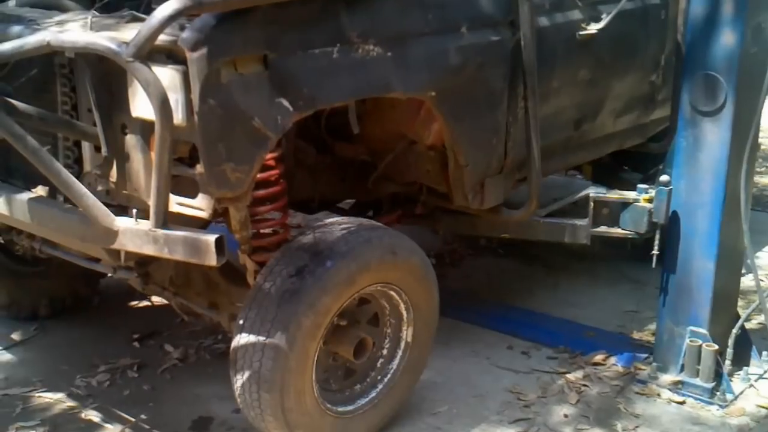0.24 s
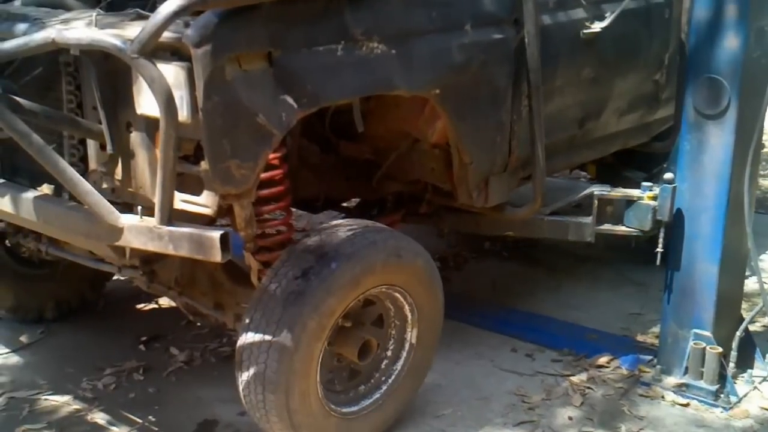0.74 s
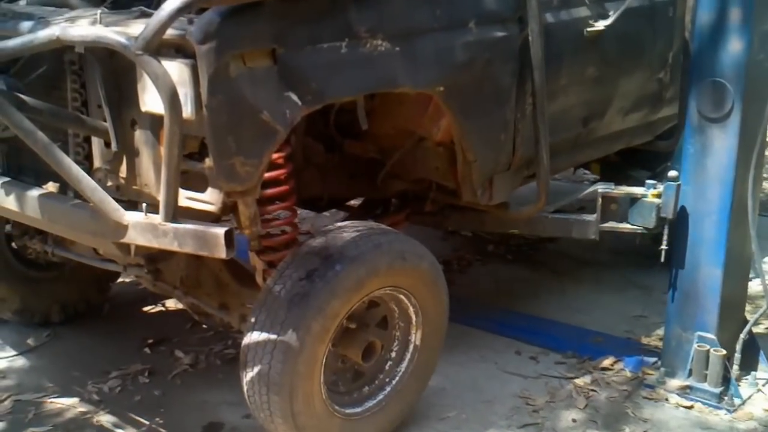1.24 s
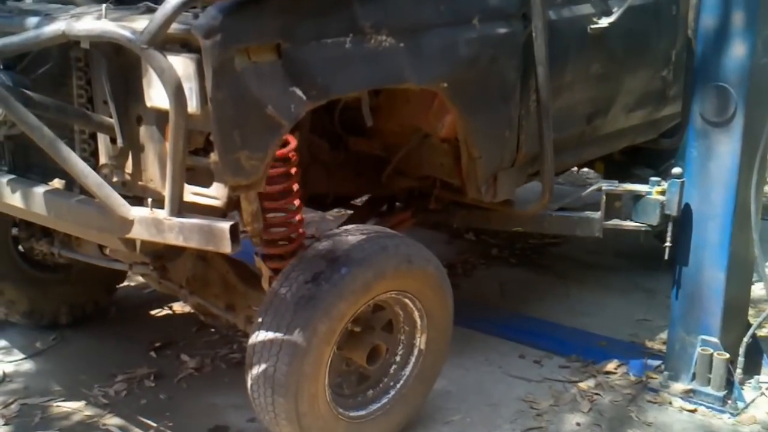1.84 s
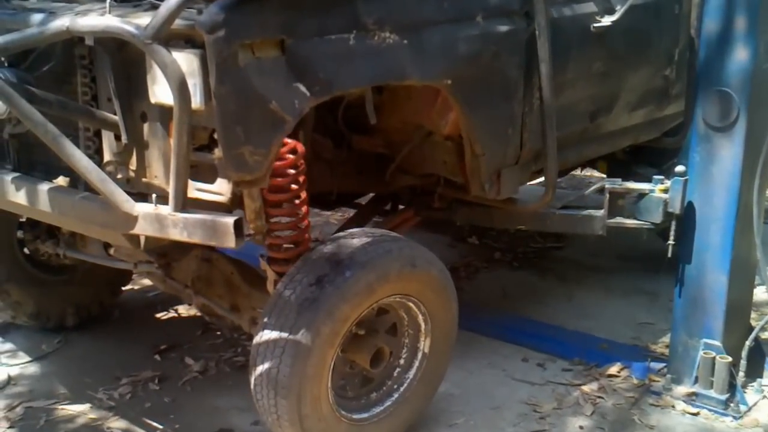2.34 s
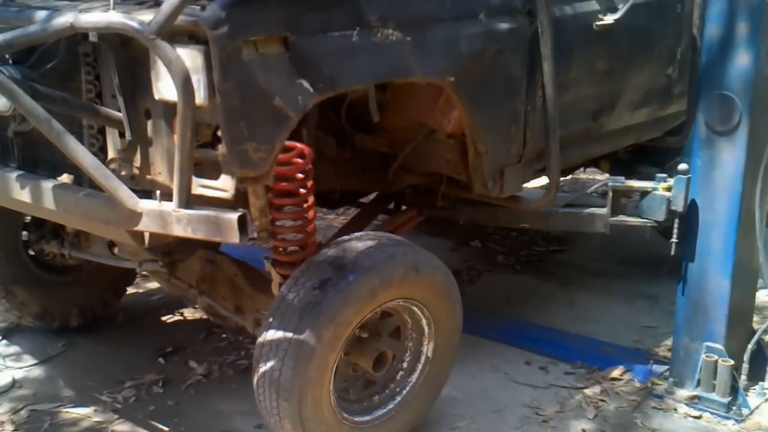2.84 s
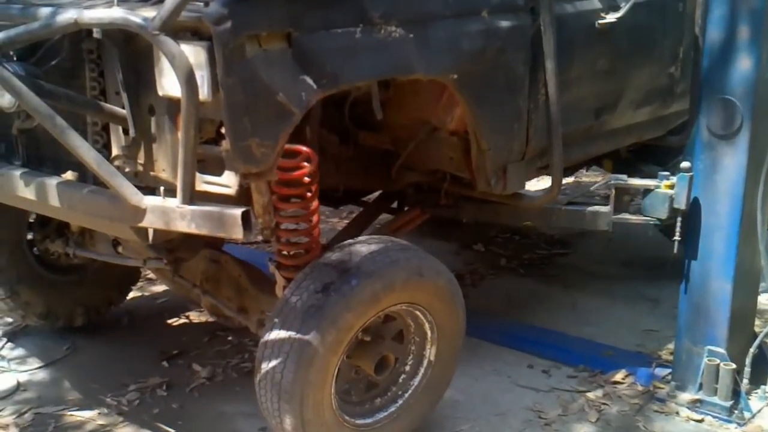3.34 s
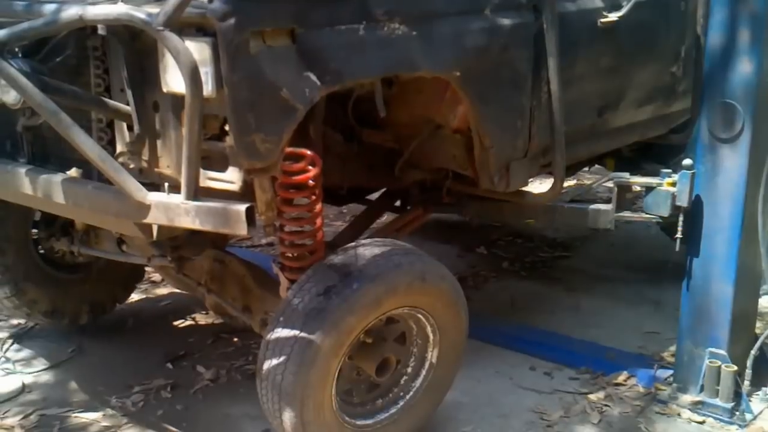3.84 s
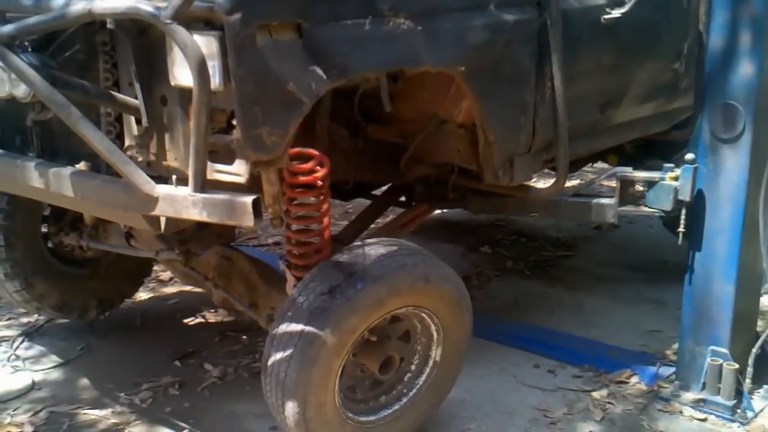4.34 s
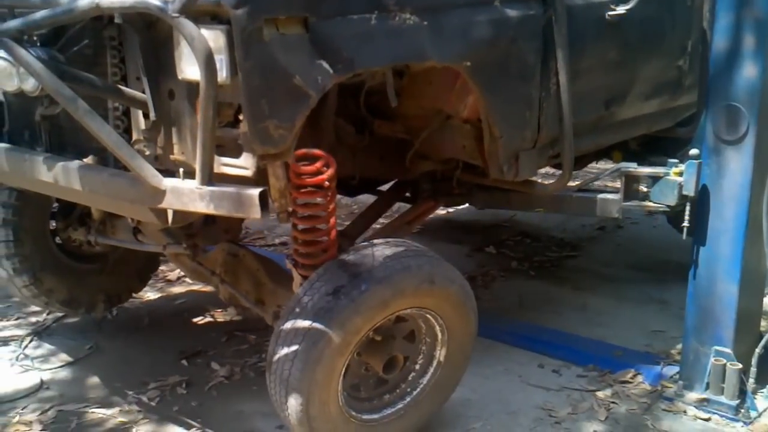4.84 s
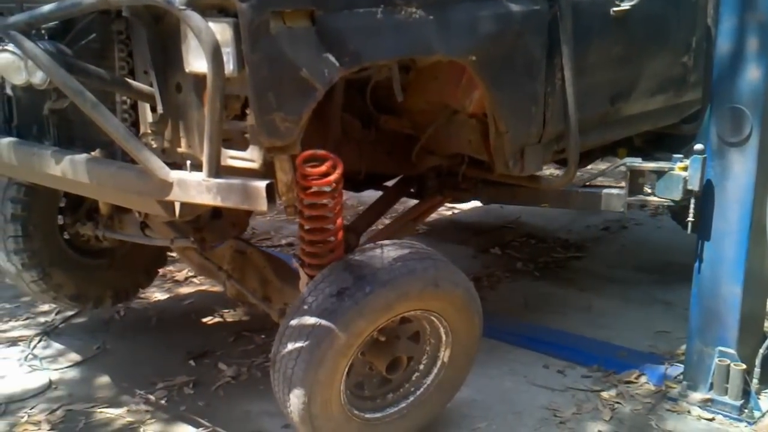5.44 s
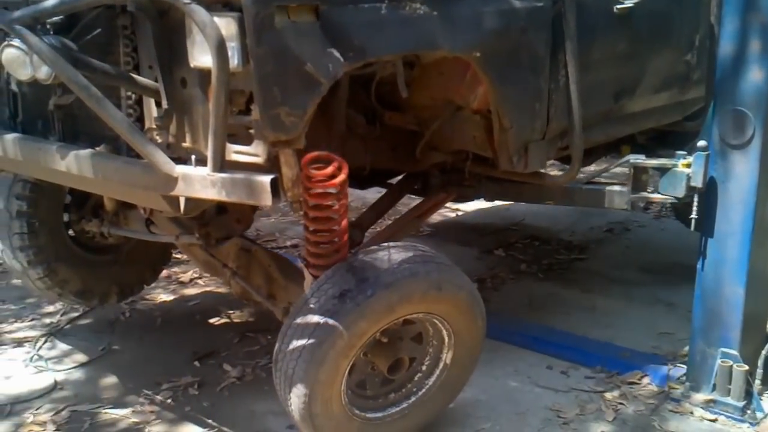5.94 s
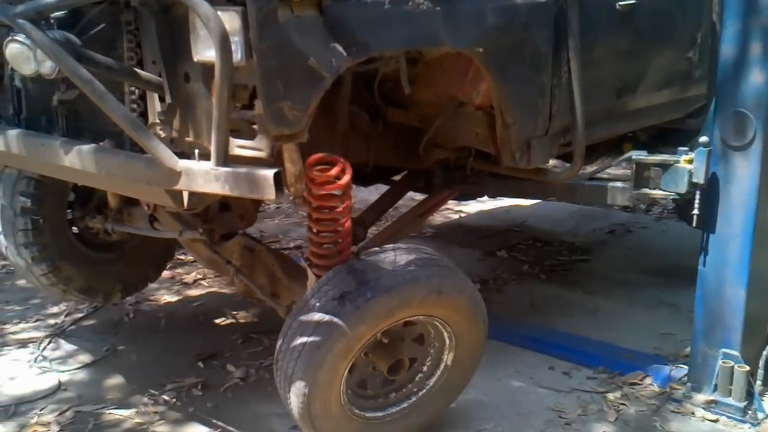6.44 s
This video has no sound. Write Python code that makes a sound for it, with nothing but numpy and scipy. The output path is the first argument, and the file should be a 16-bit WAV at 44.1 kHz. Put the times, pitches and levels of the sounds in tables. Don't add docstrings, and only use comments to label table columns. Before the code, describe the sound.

An electric hydraulic pump whines and roars steadily in an open garage while a lift's safety latch clanks hard about every two seconds.

```python
import sys
import numpy as np
from scipy import signal
from scipy.fft import rfft, irfft
from scipy.io import wavfile
from scipy.ndimage import uniform_filter1d

SR = 44100
rng = np.random.default_rng(int(sys.argv[2]) if len(sys.argv) > 2 else 0)


def undo_db(level):
    steps = np.asarray(level, float) / 20
    return 10 ** steps


def file_out(sig):
    cols = np.atleast_2d(sig).T
    lim = np.clip(cols, -1, 1)
    pcm = np.round(lim * 32767).astype(np.int16)
    wavfile.write(sys.argv[1], SR, pcm)


N = 295405
SLOW_STEP = 200
SLOW_S = np.arange(N // SLOW_STEP + 2) * SLOW_STEP / SR

# (time [s], speed relative to the loaded speed [ratio])
SHAFT_SPEED = [
    (0, 1.0041),
    (1, 1.0028),
    (2.5, 1.0003),
    (6.7, .9993),
]
HUM_HZ = (360.1, 458.8, 481.2, 504.3, 745.1, 940.5)
WHINE_HZ = (1092.3, 1181.2, 1661.9, 1707.3)
POST_HZ = (1226.4, 1422.4, 1467.7, 1949.0)
PIPE_HZ = (2016.7, 2143.4, 2304.7, 2405.3)
REST_DB = [-48, -51.5, -48, -37.5, -54, -50, -52, -46, -38, -51.5, -48, -43, -44, -45, -40, -43, -38, -42]
# (time of top [s], level [dB rms], length [s])
HUM_SWELLS = [
    [(2.2, -44, 1.6), (3.5, -39, 1.9), (4.32, -42, 0.64), (5.22, -38, 3.8)],
    [(.15, -38.5, 0.4), (1.1, -34.5, 0.67), (2.05, -29.5, 1), (2.75, -39, 0.96), (4.98, -34, 0.39),
     (6.52, -38, 0.6)],
    [(.74, -28.5, 0.95), (1.89, -32, 0.19), (4.82, -29, 0.55), (3.2, -40, 0.32), (5.4, -35.5, 0.34),
     (6.0, -37, 0.35)],
    [(.7, -33, 0.17), (1.08, -34, 0.11), (1.97, -35.5, 1), (3.11, -24, 0.74), (3.9, -33.5, 1),
     (4.5, -28.5, 0.31), (4.99, -27, 0.19), (5.6, -20, 0.82), (6.08, -27.5, 0.58)],
    [(2.1, -44, 1.9), (4.05, -45, 0.31), (6.0, -40, 2)],
    [(3.1, -37.5, 0.3), (3.61, -38, 0.46), (4.2, -39, 0.4), (2.0, -53, 0.99), (6, -37, 0.3)],
]
WHINE_SWELLS = [
    [(0.36, -32, 0.28), (0.9, -36.5, 0.8), (2.48, -31.5, 1.9), (3.25, -25, 0.23), (3.77, -26.5, 0.3),
     (4.33, -30, 1.43), (6.56, -38.5, 2.1)],
    [(0.81, -24.5, 0.66), (1.67, -33, 0.91), (3.8, -40, 2.7), (4.81, -35.6, 0.26), (5.7, -38, 0.64)],
    [(0.04, -25, 0.15), (0.41, -31.5, 0.25), (1.09, -23.5, 0.14), (1.52, -30, 0.48), (5.46, -64, 0.51)],
    [(1.2, -27.5, 0.84), (2.1, -24.5, 0.71), (3.18, -32, 0.23), (3.96, -29.5, 0.5), (5.45, -63, 0.15),
     (5.7, -38, 2.9), (6.47, -32, 1.2)],
]
POST_SWELLS = [
    [(1.67, -34.5, 0.63), (2.35, -36, 0.5), (3.94, -33.5, 1), (4.99, -24.5, 0.16), (5.37, -31, 0.48),
     (6.42, -34, 0.67)],
    [(0.5, -34, 0.35), (1.3, -35.5, 1), (3.48, -37, 1), (3.96, -26, 0.11), (4.83, -29, 0.28),
     (5.19, -32, 0.37)],
    [(0.51, -30, 0.18), (0.95, -29, 0.49), (1.67, -35, 0.51), (4.85, -30, 0.3), (5.7, -39, 0.39)],
    [(1.32, -29, 0.97), (2.05, -28.5, 0.58), (3.21, -30.5, 1.3), (5.4, -41, 2), (0.17, -35, 0.69)],
]
PIPE_SWELLS = [
    [(0.92, -32.5, 0.76), (2.95, -31, 0.36), (5.24, -36, 1)],
    [(1.2, -44, 4), (3.4, -49, 1.8), (5.19, -30, 0.28), (5.91, -31.5, 0.97)],
    [(1.28, -61, 5.5), (2.57, -50.5, 0.22), (6.6, -37, 0.34)],
    [(1.0, -44, 2.4), (3.46, -36, 0.93), (4.98, -30, 0.83)],
]
# (frequency [Hz], rest level [dB rms], swell level [dB rms], time of top [s],
# length [s])
WEAK_ORDERS = [(213.5, -66, -54, 4.6, 1), (240.2, -54, -51, 4.2, 4), (263.1, -57, -45, 4.2, 1),
               (288.0, -51, -45, 0.4, 1.6), (296.1, -52, -46, 5.4, 0.6), (305.5, -56, -44, 5.0, 0.6),
               (328.4, -59, -51, 1.8, 1), (346.5, -46, -50, 5.0, 1), (411.8, -47, -46, 4.2, 4),
               (422.6, -50, -45, 5.0, 1), (494.6, -49, -48, 5.4, 1.6), (516.8, -55, -42, 1.2, 0.6),
               (528.2, -63, -48, 3.6, 4), (546.4, -55, -47, 5.4, 4), (587.5, -59, -54, 4.8, 4),
               (634.6, -60, -53, 5.6, 0.6), (699.8, -54, -43, 2.45, 0.9), (909.8, -55, -42, 6.3, 1.6),
               (963.6, -60, -49, 2.6, 1.6), (985.8, -50, -46, 4.8, 0.6), (1008.7, -55, -37, 5.6, 0.6),
               (1056.5, -53, -51, 4.2, 1.6), (1135.9, -46, -43, 1.8, 0.6), (1150.7, -55, -40, 3.0, 1),
               (1209.9, -49, -49, 6.4, 1.6), (1273.8, -48, -50, 0.6, 1.6), (1297.4, -52, -48, 6.0, 1),
               (1333.0, -55, -47, 2.8, 1.6), (1438.0, -49, -50, 5.8, 2.5), (1456.2, -53, -41, 4.8, 2.5),
               (1514.1, -53, -39, 1.4, 2.5), (1541.0, -43, -46, 5.4, 1.6), (1587.4, -52, -42, 4.0, 1.6),
               (1615.0, -49, -44, 4.6, 2.5), (1696.4, -52, -41, 5.0, 1.6), (1761.0, -48, -39, 5.8, 1),
               (1784.6, -40, -44, 3.0, 0.6), (1819.6, -40, -38, 4.6, 1), (1903.0, -42, -40, 1.4, 1.6),
               (2001.2, -41, -41, 0.2, 2.5),
               (2073.2, -46, -42, 5.8, 1), (2188.3, -46, -34, 4.8, 2.5), (2242.8, -47, -45, 0.2, 0.6),
               (2283.9, -47, -41, 5.4, 1.6), (2363.9, -40, -41, 6.4, 2.5), (2384.8, -47, -36, 2.6, 0.6),
               (2427.9, -48, -43, 1.0, 1), (2524.1, -47, -56, 3.4, 0.6), (2592.7, -54, -55, 4.0, 2.5),
               (2626.4, -47, -43, 0.8, 1), (2641.9, -53, -42, 5.0, 4), (2670.1, -60, -47, 4.0, 2.5),
               (2706.5, -55, -51, 1.4, 1), (2729.3, -54, -55, 1.6, 1), (2866.6, -47, -43, 6.6, 4),
               (2911.0, -46, -49, 2.0, 4), (3103.5, -49, -48, 5.0, 1), (3151.2, -43, -41, 3.0, 0.6),
               (3170.1, -56, -50, 4.4, 2.5), (3191.0, -55, -49, 2.2, 2.5), (3227.3, -47, -47, 2.8, 1.6),
               (3345.7, -57, -54, 6.2, 1.6), (3388.8, -58, -51, 2.6, 1), (3456.1, -56, -53, 2.6, 4),
               (3479.0, -55, -47, 1.6, 0.6), (3516.0, -54, -54, 0.6, 0.6), (3686.2, -58, -58, 3.0, 2.5),
               (3705.7, -65, -53, 4.8, 0.6), (3721.9, -61, -55, 2.2, 1), (3745.4, -57, -55, 3.4, 1),
               (3802.6, -64, -60, 1.4, 1), (3866.6, -65, -56, 0.4, 0.6), (3974.2, -70, -66, 5.4, 2.5),
               (4009.9, -73, -63, 2.2, 1.6), (4032.8, -71, -63, 3.2, 2.5), (4092.0, -66, -72, 6.4, 4),
               (4184.8, -75, -64, 3.0, 1), (4262.9, -76, -69, 4.0, 2.5), (4548.2, -71, -69, 5.4, 0.6),
               (4667.3, -73, -75, 1.0, 0.6),
               (699.8, -62, -44, 5.7, 1.2), (2549, -52, -52, 3, 2), (2943, -55, -54, 3, 2),
                (3024, -59, -56, 3, 2), (3062, -58, -57, 4, 2), (3628, -61, -56, 3, 1.6)]
# (frequency [Hz], level [dB rms])
BEATING_TONES = [(176.13, -54), (182.0, -52)]
# (time [s], clank [dB], thud [dB], clank ring [s], struck ring [dB])
LATCH_CONTACTS = [(0.478, -31, -19, 0.11, -30), (0.496, -36, -20.5, 0.28, -32),
                  (0.539, -38, -19, 0.15, -41), (2.294, -16, -17, 0.14, -44),
                  (2.311, -25, -24, 0.54, -28.5), (2.328, -25, -25, 0.33, -37),
                  (4.242, -14.5, -16.5, 0.14, -36), (4.261, -14.5, -25, 0.19, -33),
                  (4.272, -14, -30, 0.08, -53), (4.289, -20, -24.5, 0.26, -36),
                  (6.183, -15.5, -11.5, 0.049, -28), (6.193, -9, -20, 0.062, -28),
                  (6.211, -13, -21, 0.14, -41), (6.229, -18, -23, 0.23, -43)]
# (time [s], peak level [dB])
KNOCKS = [(0.4775, -19), (0.4808, -13), (0.4838, -20), (0.4895, -9), (0.4933, -11), (0.4979, -11),
          (0.503, -5), (0.5155, -13), (0.5192, -10), (0.553, -22), (0.5625, -12), (2.294, -10),
          (2.2976, -8), (2.3032, -9), (2.3069, -11), (2.3106, -5), (2.3173, -5.5), (2.3217, -11),
          (2.3297, -14), (2.3374, -15), (2.3445, -12), (2.3529, -7), (4.2455, -10), (4.2486, -22),
          (4.2531, -10), (4.2572, -7), (4.2609, -7), (4.2644, -8), (4.2674, -7.5), (4.2705, -16),
          (4.2735, -10), (4.2809, -10.5), (4.2904, -6), (6.1677, -6), (6.1838, -9), (6.1905, -11),
          (6.1944, -6), (6.1978, -12), (6.2017, -13), (6.2062, -14), (6.2105, -13), (6.2137, -13),
          (6.2199, -10), (6.232, -12)]
# (frequency [Hz], width [Hz], level [dB])
POST_LOW = [(197, 22, -3), (315, 62, -0.5), (712, 86, 0.5), (753, 120, -1), (950, 76, -1), (1226, 62, -1)]
POST_HIGH = [(1560, 184, 6), (2053, 220, 8.5), (2400, 126, 3.5), (2600, 300, -1), (3430, 1250, -11.5),
             (4250, 320, -12.5), (4600, 370, -22), (8040, 6000, -28.5)]
# (frequency [Hz], width [Hz], level [dB])
STEEL_CRACK = [(3600, 1600, -13), (5600, 2500, -29), (9500, 6000, -48)]
# (frequency [Hz], level [dB], t60 [s])
STRUCK_MODES = [(220, -5.5, 0.21), (253.3, -2.5, 0.45), (314, -29, .4), (692, -9, 0.34), (789, 0, 0.19),
                (940, -8, 0.046), (1185, 1, 0.21), (1990, 11, 0.076), (2020, 1, 0.07), (2566, 16, 0.2)]
# (time [s], frequency [Hz], level [dB], t60 [s])
CARRIAGE_RINGS = [(0.489, 250, -17.5, 0.22), (.495, 797, -17, 0.18), (.5, 940, -28, 0.17),
                  (.52, 708, -21.5, 0.28), (.535, 250, -26, 0.25), (.545, 275, -24, 1.1),
                  (2.30, 813, -26, .3), (2.30, 315, -19, 0.25), (2.335, 272.5, -24.5, 1.7),
                  (4.248, 323, -26, 0.7), (4.25, 660, -31, .15), (6.187, 940, -19, 0.18),
                  (6.189, 276, -23, 0.44)]
# (frequency [Hz], level [dB per Hz])
ROAR = [(25, -77), (100, -82.5), (165, -80), (200, -78.5), (290, -65.5), (540, -62), (600, -69.5),
        (870, -67.5), (1400, -65), (2400, -56), (2520, -60), (3400, -68.5), (4000, -78.5), (5600, -90)]
# (frequency [Hz], level [dB per Hz])
OIL_HISS = [(3000, -95), (4500, -85), (5600, -91), (6500, -85), (8000, -86), (9000, -88), (11500, -88),
            (12500, -91), (13300, -94), (13800, -89), (13900, -110)]
# (frequency [Hz], width [Hz], level above the roar [dB])
PANELS = [(328, 15, 3.5), (412, 16, 9), (469, 44, 10), (690, 58, 3.5), (1127, 98, 8.5), (1476, 65, 8),
          (1720, 195, 7.5), (2060, 140, -1.5), (2260, 160, -3), (2725, 190, 5.5), (3290, 90, 2.5),
          (3413, 39, 6.5), (3680, 200, 3.5), (3870, 60, 3), (5320, 460, 3.5), (6970, 440, 4.5),
          (7720, 160, 6)]
# (frequency [Hz], width [Hz], depth [dB])
PANEL_GAPS = [(278, 12, 6), (380, 24, 6), (434, 16, 5), (492, 10, 3), (522, 20, 2), (560, 14, 5),
              (615, 16, 4), (1262, 14, 5), (1312, 16, 4), (1490, 16, 3), (1640, 16, 3), (1740, 30, 2),
              (2100, 40, 3), (2530, 190, 6), (2690, 120, 4), (2965, 30, 3), (3500, 500, 1), (4480, 160, 2)]
# (frequency [Hz], level [dB])
LOW_SIDE = [(25, 16), (60, 21.5), (130, -4), (350, -17), (550, -8), (900, -13), (1250, -23)]
# (frequency [Hz], level [dB])
MID_LEAK = [(2000, -26), (5300, -5.5), (7000, -5.5), (13000, 0.5)]
# (frequency [Hz], left minus right [dB])
PORT_TILT = [(60, -1.5), (200, -2.5), (360, -.5), (660, -2.5), (1200, 0), (1800, 2.5), (2300, 1),
             (3100, -4), (4000, -1), (4500, 0)]
# (time [s], left minus right [dB])
MIC_TURN = [
    (0.0, 2),
    (0.5, 1.5),
    (1.53, 0),
    (3.15, -0.3),
    (4.25, 0),
    (4.68, 0),
    (6.2, 0.5),
    (6.7, 1),
]
# (low edge [Hz], high edge [Hz], share
MID_MUTES = [(2480, 2690, .5), (4600, 4880, .12), (4880, 5200, .62), (5200, 5700, .85), (7580, 8270, .28),
             (9700, 10400, .16), (10400, 10900, .14), (12450, 13300, .44)]
SIDE_MUTES = [(1000, 1320, .5), (3830, 4180, .68), (5480, 5720, .12), (6100, 6350, .5), (6350, 6870, .98),
              (8700, 9050, .4), (9050, 9570, .95), (11050, 11400, .45), (11400, 12150, .82),
              (12150, 12450, .3), (12300, 12700, .08), (13250, 13600, .2), (13600, 14100, .35)]


def in_time(rows):
    s, *columns = np.transpose(rows)
    return [np.interp(np.arange(N) / SR, s, column) for column in columns]


def at_hz(points, hz):
    table_hz, db = np.transpose(points)
    return np.interp(np.log(hz), np.log(table_hz), db)


def drift(rate, count):
    r = np.exp(-2 * np.pi * rate * SLOW_STEP / SR)
    chance = rng.standard_normal((count, N // SLOW_STEP + 402))
    slow = signal.lfilter([1], [1, -2 * r, r * r], chance)[:, 400:]
    return slow / slow.std(axis=1, keepdims=True)


def full(slow):
    return np.interp(np.arange(N) / SLOW_STEP, np.arange(len(slow)), slow)


def swell(top_s, db, length_s):
    return undo_db(db) * np.exp(-(2 * (SLOW_S - top_s) / length_s) ** 2)


def add_at(track, s, sound):
    at = round(s * SR)
    length = sound.shape[-1]
    track[..., at:at + length] += sound[..., :N - at]


def resonate(x, modes):
    out = 0
    for k, (hz, width_hz, db) in enumerate(modes):
        r = np.exp(-np.pi * width_hz / SR)
        poles = [1, -2 * r * np.cos(2 * np.pi * hz / SR), r * r]
        zeros = [(1 - r * r) / 2, 0, -(1 - r * r) / 2]
        out = out + (-1) ** k * undo_db(db) * signal.lfilter(zeros, poles, x)
    return out


def partials(hz_list, gains, wobble, rate):
    side_flips_hz = 2350
    turns = np.cumsum(in_time(SHAFT_SPEED)[0]) / SR
    out = np.zeros((2, N))
    for hz, gain in zip(hz_list, gains):
        shared, own = drift(rate, count=2)
        phase = 2 * np.pi * (hz * turns + rng.random()) + wobble * full(shared)
        side_sign = np.sign(side_flips_hz - hz)
        out[0] += np.sqrt(2) * gain * np.sin(phase)
        out[1] += np.sqrt(2) * gain * np.cos(phase + wobble * full(own)) * side_sign
    return out


def motor_and_gears(flutter_db=1.5, flutter_per_s=3.0, scatter=0.16):
    swells = HUM_SWELLS + WHINE_SWELLS + POST_SWELLS + PIPE_SWELLS
    flutter = flutter_db * drift(flutter_per_s, count=len(swells))
    fades = np.abs(1 + scatter * drift(flutter_per_s, count=len(swells)))
    fades[:len(HUM_HZ)] = 1
    gains = []
    for rest, shake, rows, fade in zip(REST_DB, flutter, swells, fades):
        gain = undo_db(rest + shake) + sum(swell(*row) for row in rows)
        gains.append(full(gain) * full(fade))
    return partials(HUM_HZ + WHINE_HZ + POST_HZ + PIPE_HZ, gains, wobble=0.14, rate=3.0)


def orders(scatter=0.52, fade_rate=1.86):
    table = WEAK_ORDERS
    paths = np.abs(1 + scatter * drift(fade_rate, count=len(table)))
    gains = []
    for (hz, rest, db, top, length), path in zip(table, paths):
        gains.append(full(path * (undo_db(rest) + swell(top, db, length))))
    return undo_db(0.87) * partials([row[0] for row in table], gains, wobble=0.7, rate=2.7)


def low_tones(in_step_s=0.015):
    turns = np.cumsum(in_time(SHAFT_SPEED)[0]) / SR - in_step_s
    quarter_turn = np.array([[0], [np.pi / 2]])
    return sum(np.sqrt(2) * undo_db(db) * np.sin(2 * np.pi * hz * turns + quarter_turn)
               for hz, db in BEATING_TONES)


def latch(rise_s=0.002, struck_rise_s=0.00088, rattle_per_s=3500, dulled_above_hz=9300):
    clank, thud, struck = np.zeros((3, 2, N))
    age = np.arange(SR // 2) / SR
    rise = 1 - np.exp(-age / rise_s)
    struck_rise = 1 - np.exp(-age / struck_rise_s)
    for s, clank_db, thud_db, ring_s, struck_db in LATCH_CONTACTS:
        clank_shape = rise * undo_db(clank_db - 60 * age / ring_s)
        thud_shape = rise * undo_db(thud_db - 60 * age / (1.6 * ring_s))
        chatter = (rng.random(len(age)) < rattle_per_s / SR) * np.sqrt(SR / rattle_per_s)
        chance_db = rng.normal(0, 3.7, len(STRUCK_MODES))
        rings = 0
        for (hz, db, t60), chance in zip(STRUCK_MODES, chance_db):
            rings = rings + undo_db(struck_db + db + chance - 60 * age / t60) * np.sin(2 * np.pi * hz * age)
        add_at(clank, s, clank_shape * rng.standard_normal((2, len(age))) * chatter)
        add_at(thud, s, thud_shape * rng.standard_normal((2, len(age))))
        add_at(struck, s, rings * struck_rise * [[1], [-1]])
    clank[1] -= 0.25 * clank[0]
    bright = undo_db(10.5) * resonate(clank + 1e-18, POST_HIGH)
    dull = undo_db(18.0) * resonate(thud + 1e-18, POST_LOW)
    distance = signal.butter(2, dulled_above_hz, fs=SR, output="sos")
    post = signal.sosfilt(distance, bright + dull + struck)
    return signal.sosfilt(signal.butter(6, 185, "high", fs=SR, output="sos"), post)


def knocks():
    clicks = np.zeros((2, N))
    s, db = np.transpose(KNOCKS)
    lean = 1 + 0.2 * rng.standard_normal((len(s), 2))
    signs = rng.choice([-1, 1], len(s)) * [[1], [-1]]
    clicks[:, (s * SR).astype(int)] = undo_db(db) * lean.T * signs
    clicks = clicks + 1e-18
    post = undo_db(18) * resonate(clicks, POST_HIGH) + undo_db(24) * resonate(clicks, POST_LOW[2:])
    post = post + undo_db(6) * resonate(clicks, STEEL_CRACK)
    return signal.sosfilt(signal.butter(2, 12000, fs=SR, output="sos"), post)


def carriage(rise_s=0.0081):
    out, age = np.zeros(N), np.arange(SR // 2) / SR
    for s, hz, db, t60 in CARRIAGE_RINGS:
        shape = (1 - np.exp(-age / rise_s)) * undo_db(db - 60 * age / t60)
        add_at(out, s, shape * np.sin(2 * np.pi * hz * age))
    return out * [[1], [-1]]


def roar(patchy_db=1.6, hiss_patchy_db=0.2):
    hz = np.maximum(np.arange(N // 2 + 1) * SR / N, 1)
    lift = 1
    for mid, width, db in PANELS:
        lift = lift + (undo_db(db) ** 2 - 1) / (1 + (2 * (hz - mid) / width) ** 2)
    for mid, width, db in PANEL_GAPS:
        lift = lift * undo_db(-2 * db * np.exp(-(2 * (hz - mid) / width) ** 2 / 2))
    power = undo_db(at_hz(ROAR, hz)) ** 2 + undo_db(at_hz(OIL_HISS, hz)) ** 2
    spectrum = rfft(rng.standard_normal((2, N))) * np.sqrt(lift * power * SR / 2)
    place = np.clip(2 * np.log2(hz / 100), 0, 12)
    out = np.zeros((2, N))
    for k, patch in enumerate(drift(9.6, count=13)):
        share = np.clip(1 - np.abs(place - k), 0, 1)
        depth_db = patchy_db if k < 11 else hiss_patchy_db
        out += irfft(spectrum * share, N) * undo_db(depth_db * full(patch))
    return out


def ports(paths, comb_hz=2585, side_leak_db=-18):
    hz = np.maximum(np.arange(N // 2 + 1) * SR / N, 1)
    angle = np.pi * hz / comb_hz
    side_power = np.cos(angle) ** 2 + undo_db(side_leak_db) ** 2
    mid_power = np.sin(angle) ** 2 + undo_db(at_hz(MID_LEAK, hz)) ** 2
    low_ratio = undo_db(at_hz(LOW_SIDE, hz)) ** 2
    ratio = np.where(hz < LOW_SIDE[-1][0], low_ratio, side_power / mid_power)
    mid, side = rfft(paths) * np.sqrt([1 / (1 + ratio), ratio / (1 + ratio)])
    side = side * np.where(hz > 6960, undo_db(1), 1)
    lean_db = np.where(hz < 4500, at_hz(PORT_TILT, hz), 0) / 2
    pair = irfft([(mid + side) * undo_db(lean_db), (mid - side) * undo_db(-lean_db)], N)
    return pair * undo_db(in_time(MIC_TURN)[0] * [[0.5], [-0.5]])


def gain_control(x, threshold_db=-18, squeeze=0.64, sense_s=0.014, fall_s=0.018, climb_db_per_s=2):
    open_db, start_cut_db = 0.26, 2
    lag, fall = np.exp(-1 / (sense_s * SR)), np.exp(-1 / (fall_s * SR))
    power = signal.lfilter([1 - lag], [1, -lag], np.mean(x ** 2, axis=0))
    level_db = 10 * np.log10(power + 1e-12)
    cut = squeeze * np.maximum(level_db - threshold_db, 0)
    cut[0] = start_cut_db
    climb = climb_db_per_s * np.arange(N) / SR
    held = np.maximum.accumulate(cut + climb) - climb
    smooth_cut = signal.lfilter([1 - fall], [1, -fall], held, zi=[fall * start_cut_db])[0]
    return x * undo_db(open_db - smooth_cut)


def mute(path, bands, coarse_above_hz=3900, weak_share=0.66, makeup_db=-0.17):
    hz, _, frames = signal.stft(path, SR, nperseg=1536)
    luck = signal.lfilter([1], [1, -0.6], rng.standard_normal((len(bands), frames.shape[1])))
    size = np.abs(frames)
    around = uniform_filter1d(uniform_filter1d(size, size=25, axis=0), size=3, axis=1)
    kept = undo_db(makeup_db) * (size > weak_share * around)
    frames = frames * np.where(hz[:, None] > coarse_above_hz, kept, 1)
    for (low, high, share), row in zip(bands, luck):
        frames[np.ix_((hz >= low) & (hz < high), row < np.quantile(row, share))] = 0
    return signal.istft(frames, SR, nperseg=1536)[1][:N]


def scene():
    machine = motor_and_gears() + orders() + low_tones()
    drops = latch() + knocks() + carriage()
    return ports(machine + drops + roar())


def top_cut(x):
    return signal.sosfilt(signal.butter(12, 13850, fs=SR, output="sos"), x)


def record(dry):
    ceiling = 1.6
    left, right = ceiling * np.tanh(gain_control(dry) / ceiling)
    mid = mute((left + right) / 2, MID_MUTES)
    side = mute((left - right) / 2, SIDE_MUTES)
    return top_cut(np.array([mid + side, mid - side]))


dry = scene()
out = record(dry)
file_out(out)
```